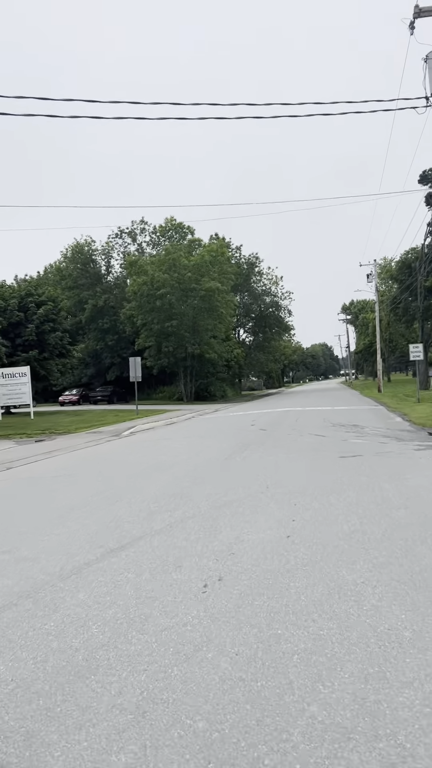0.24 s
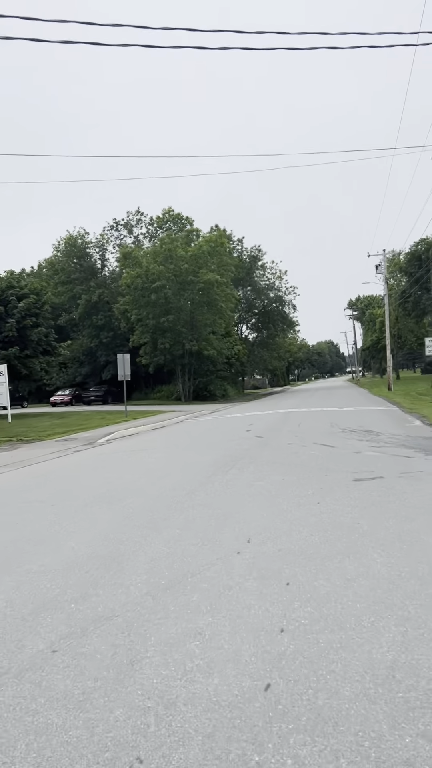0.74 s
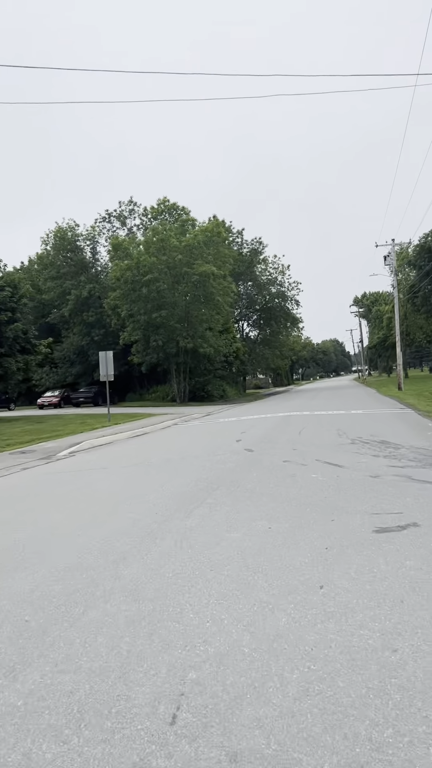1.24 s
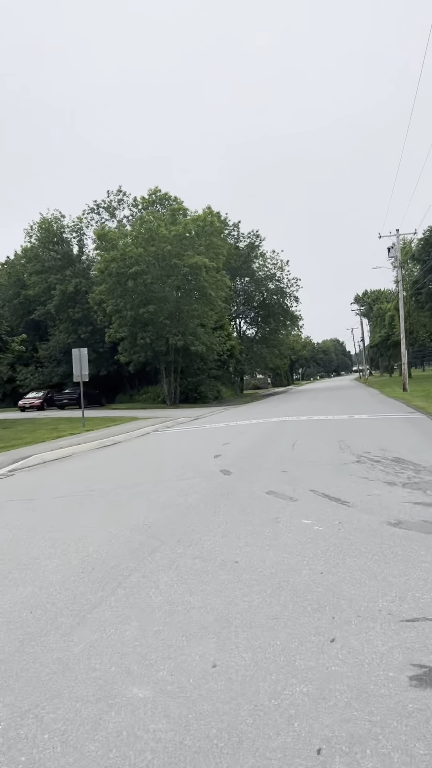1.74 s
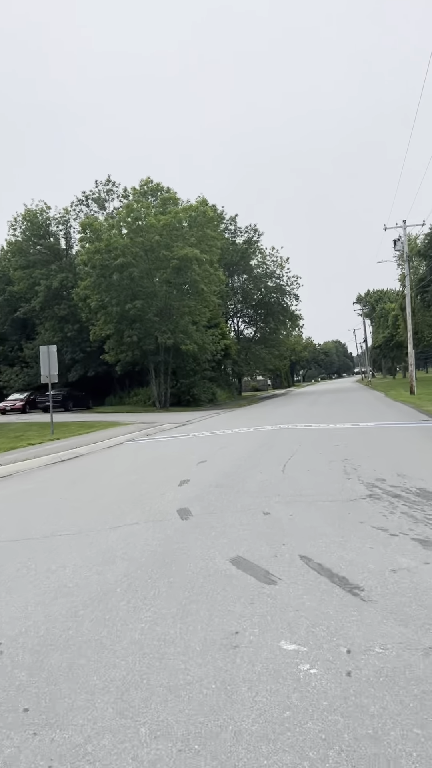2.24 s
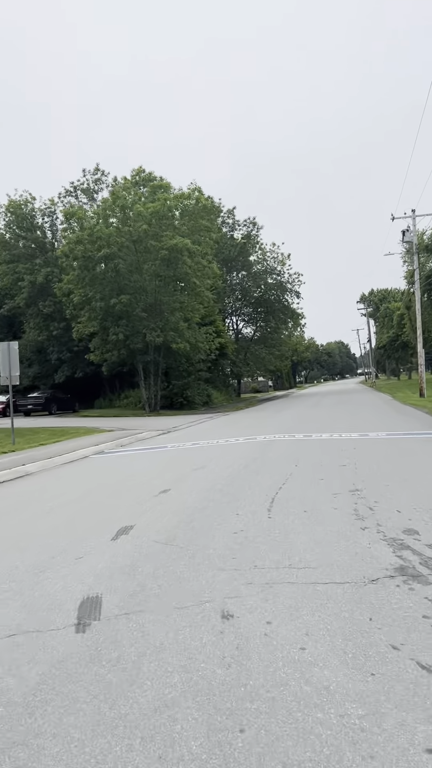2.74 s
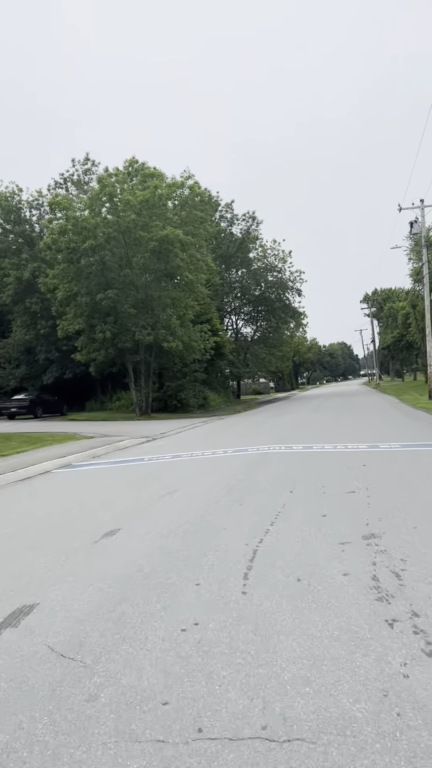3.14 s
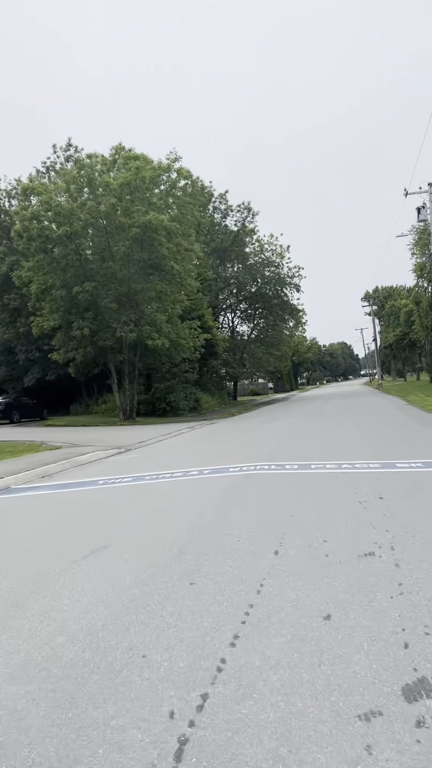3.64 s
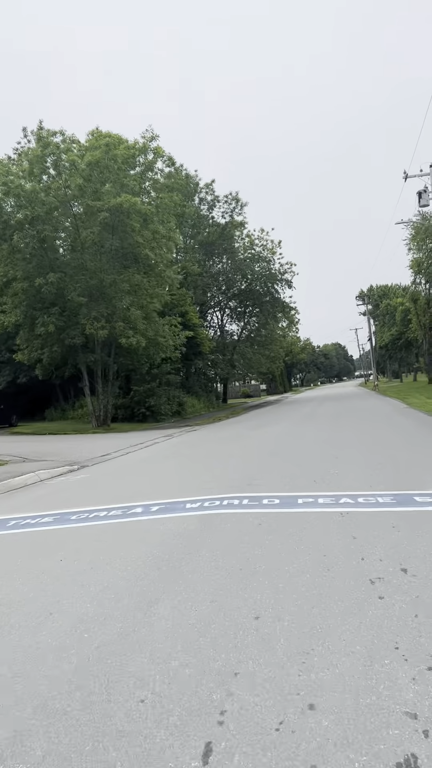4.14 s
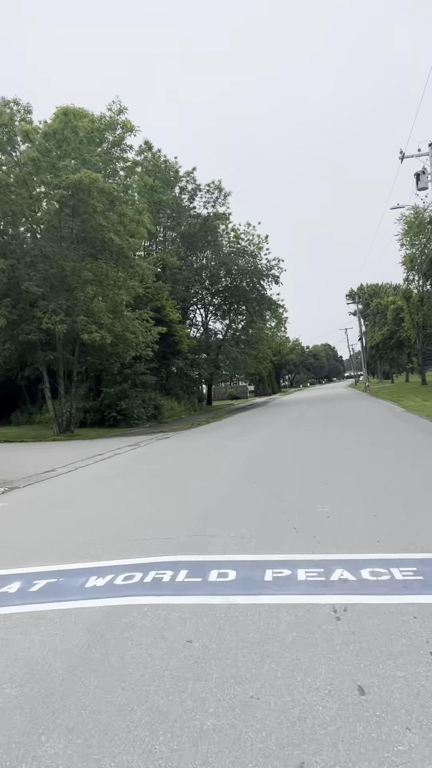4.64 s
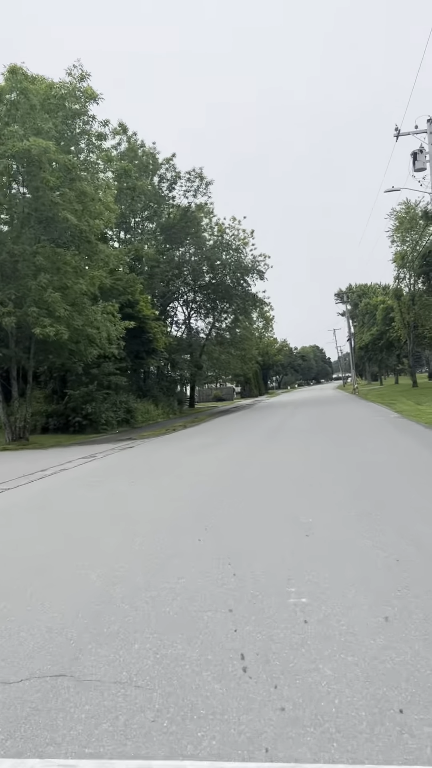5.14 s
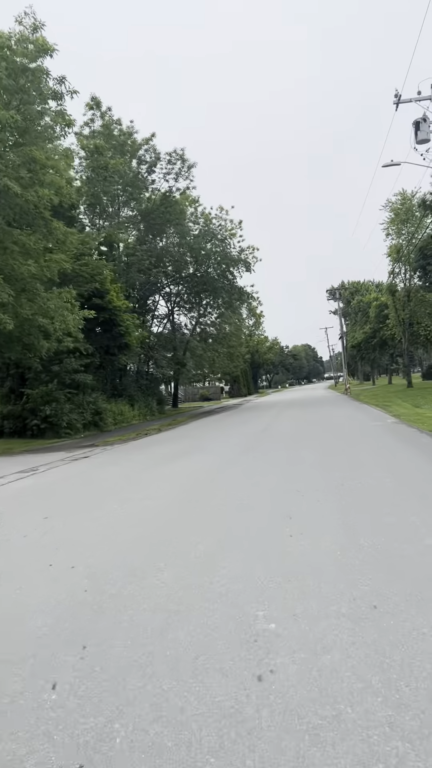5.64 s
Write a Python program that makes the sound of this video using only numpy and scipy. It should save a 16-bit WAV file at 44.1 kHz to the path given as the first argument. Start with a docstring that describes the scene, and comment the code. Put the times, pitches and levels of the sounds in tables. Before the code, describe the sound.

Riding an electric scooter down a street: mid-pitched hum, tyre hiss, constant irregular metallic rattling, and wind buffets that strengthen after two seconds.

```python
"""An electric scooter rolls at a steady speed along an asphalt street, heard by a phone on the handlebar.
From the start the motor hums (two sine waves), the tyres hiss and the wind rumbles (shaped noise).
A loose part of the mount ticks throughout (short ringing tones), with a faint jingle that comes and goes.
Wind thumps (short pressure wiggles) grow strong after about two seconds; the hiss slowly fades
and the octave above the hum slowly grows, with more strong gusts and thumps towards the end."""
import sys
import numpy as np
from scipy import signal
from scipy.fft import rfft, irfft, next_fast_len
from scipy.io import wavfile
from scipy.ndimage import uniform_filter1d

SR = 44100
rng = np.random.default_rng(int(sys.argv[2]) if len(sys.argv) > 2 else 0)


def to_wav(s):
    """Save 16-bit WAV."""
    ch = np.atleast_2d(s).T  # columns
    pcm = np.round(np.clip(ch, -1, 1) * 32767)  # PCM
    wavfile.write(sys.argv[1], SR, pcm.astype(np.int16))


N = 258950  # length [samples]
T = np.arange(N) / SR  # time of every sample [s]
M = next_fast_len(N)  # padded length for quick frequency work [samples]
HZ = np.maximum(np.arange(M // 2 + 1) * SR / M, 1)  # frequency grid [Hz]


def undb(db):
    """Turns decibels into a gain."""
    return 10 ** (np.asarray(db) / 20)


def over_hz(table):
    """Reads the columns of a (frequency, value, ..) table on the frequency grid."""
    hz, *columns = np.transpose(table)
    return np.squeeze([np.interp(np.log(HZ), np.log(hz), column) for column in columns])


def over_time(table):
    """Reads the columns of a (time, value, ..) table, sample by sample."""
    s, *columns = np.transpose(table)
    return [np.interp(T, s, column) for column in columns]


def walk(rate):
    """Wanders smoothly at random: levels held for 1 / rate seconds, averaged twice; spread near 1."""
    hold = int(SR / rate)
    steps = np.repeat(rng.standard_normal(N // hold + 1), hold)
    smooth = uniform_filter1d(uniform_filter1d(steps, hold), hold)
    return 1.236 * smooth[:N]  # makes up for the spread lost in averaging


def scatter(per_s, count):
    """Picks random times [s], each with a number of even random draws from 0 to 1."""
    rows = rng.random((int(per_s * N / SR), count + 1))
    return rows[:, 0] * N / SR, *rows[:, 1:].T


def add(track, s, sound):
    """Mixes a sound into a track from second s."""
    start = max(int(s * SR), 0)
    track[start:start + len(sound)] += sound[:N - start]


def band_pass(order, edges, noise):
    """Keeps only the frequencies between the two edges [Hz]."""
    return signal.sosfilt(signal.butter(order, edges, "band", fs=SR, output="sos"), noise)


def rush(colour, lo_hz, hi_hz, shared_db, shared_rate, own_db, own_rate):
    """Stereo noise whose octave bands throb together and flicker alone; rms 1 from lo to hi before that."""
    # how unlike the two sides are: (frequency [Hz], side level minus mid level [dB])
    width = [(60, -25), (110, -18.5), (200, -12.5), (380, -22), (700, -11), (1000, -6.5), (1450, -6),
             (1800, -33), (2600, -23), (4400, -20), (8120, -9), (15000, -3)]
    lowest, highest = colour[0][0], colour[-1][0]
    gain = undb(over_hz(colour)) * (HZ >= lowest) * (HZ <= highest)
    inside = (HZ > lo_hz) & (HZ < hi_hz)
    gain = gain / np.sqrt(np.sum(gain[inside] ** 2) / len(HZ))
    mid, side = rfft(rng.standard_normal((2, M))) * gain
    side = side * undb(over_hz(width))
    stereo = np.array([mid + side, mid - side])
    out, shared = 0, shared_db * walk(shared_rate)
    for octave in range(int(np.log2(lowest)), int(np.log2(highest)) + 2):
        # neighbouring bands overlap and add up to one
        band = np.cos(np.pi / 2 * np.clip(np.log2(HZ) - octave, -1, 1)) ** 2
        out = out + irfft(band * stereo, M)[:, :N] * undb(shared + own_db * walk(own_rate))
    return out


MEAN_GUST_DB = -35  # the wind level that counts as an average gust


def gust():
    """Tells how far the wind stands above its average level [dB]."""
    # wind on the microphones: (time [s], level [dB])
    gusts = [(0.0, -46), (0.08, -32.5), (0.39, -40.5), (0.49, -33), (0.52, -41), (0.83, -33.5),
             (1.54, -40.5), (1.85, -30.5), (2.17, -33.5), (2.22, -25.5), (2.29, -35), (2.32, -28),
             (2.76, -39.5), (2.89, -32), (2.99, -36.5), (3.01, -32), (4.22, -31.5), (4.33, -34),
             (4.86, -32), (4.87, -26), (4.92, -34.5), (4.98, -25), (5.18, -36), (5.28, -27), (5.35, -35),
             (5.46, -28), (5.75, -41), (5.87, -22)]
    return over_time(gusts)[0] - MEAN_GUST_DB


def wind(gust_db):
    """Moving air presses on the microphones: deep noise that follows the gusts fully."""
    # colour of the deep wind: (frequency [Hz], relative level per Hz [dB])
    colour = [(20, -21), (35, -8), (60, 2.5), (90, 1), (130, -9), (200, -38)]
    noise = rush(colour, 30, 110, shared_db=1.2, shared_rate=20, own_db=0.6, own_rate=15)
    return undb(MEAN_GUST_DB + gust_db) * noise


def flutter(gust_db):
    """Higher wind noise throbs quickly and rises by 0.75 dB for each dB of gust."""
    # colour of the flutter: (frequency [Hz], relative level per Hz [dB])
    colour = [(80, -14), (130, 1.5), (250, 1), (400, -9), (700, -19.5), (1200, -23.5)]
    noise = rush(colour, 116, 350, shared_db=3.05, shared_rate=45, own_db=0.73, own_rate=30)
    return undb(-40.5 + 0.75 * gust_db) * noise


def roar(gust_db):
    """Mid-pitched noise roars fairly evenly, rising by only 0.19 dB for each dB of gust."""
    # colour of the roar: (frequency [Hz], relative level per Hz [dB])
    colour = [(280, -23), (360, -8), (430, 1.5), (540, -0.5), (620, -9), (680, -5.5), (760, -10.5),
              (850, -10.5), (1000, -13.5), (1080, -22), (1500, -30)]
    noise = rush(colour, 388, 1140, shared_db=1.96, shared_rate=40, own_db=1.7, own_rate=60)
    return undb(-43 + 0.19 * gust_db) * noise


def tyres():
    """Tyres hiss on the asphalt: bright noise that slowly fades."""
    # colour of the hiss: (frequency [Hz], relative level per Hz [dB])
    colour = [(900, -8), (1400, -1.5), (1700, 2), (2100, 3), (2800, -1.5), (3500, -10), (4600, -12.5),
              (5500, -22), (9000, -24.5), (10500, -36), (15900, -34)]
    start_db, fade_db_per_s = -48.5, 0.37
    noise = rush(colour, 1200, 3900, shared_db=1.0, shared_rate=40, own_db=1.63, own_rate=90)
    return undb(start_db - fade_db_per_s * T) * noise


def jingle():
    """Dense tiny metallic clicks at the very top, with a duller body, partly unlike on the two sides."""
    # how the jingle comes and goes: (time [s], level [dB])
    jingle_levels = [(0, -65), (.4, -78), (.56, -56.5), (.9, -65), (1.1, -75), (1.3, -61), (1.85, -77),
                     (2.29, -64), (2.6, -69.5), (3.5, -79), (4.27, -65.5), (4.6, -77), (5.23, -66),
                     (5.87, -77)]
    clicks_per_s, decay_s = 120, 0.002
    sizes = undb(np.minimum(5.5 * rng.exponential(size=N), 18))
    clicks = (rng.random(N) < clicks_per_s / SR) * sizes
    tail = np.exp(-np.arange(500) / SR / decay_s)
    envelope = 0.33 + signal.fftconvolve(clicks, tail)[:N]  # clicks above a steady bed
    top = band_pass(3, [14300, 15600], rng.standard_normal((2, N)))
    body = band_pass(3, [6250, 9100], rng.standard_normal((2, N)))
    mid, side = (top + undb(-0.5) * body) * envelope
    stereo = mid + undb(-6.5) * side * np.array([[1], [-1]])
    return undb(over_time(jingle_levels)[0]) * stereo / mid.std()


def knocks():
    """Grit clicks and the deck knocks over cracks: each a short crack of noise around its own pitch."""
    # the clicks: (time [s], peak level [dB], centre frequency [Hz])
    knock_list = [(.307, -26, 2200), (.593, -29, 4500), (.5995, -24.5, 3760), (.621, -40, 6000),
                  (.781, -41, 4870), (0.798, -35, 4500), (1.711, -40, 7000), (2.219, -41, 7900),
                  (2.39, -34.5, 6500), (3.0782, -28.5, 7200), (3.079, -34, 2500), (3.429, -34, 2300),
                  (3.858, -42, 6970), (4.381, -50, 7940), (4.758, -40, 6950), (5.493, -34, 4200)]
    width, t60_s = 0.73, 0.014  # band width as a share of the centre; time to die away by 60 dB
    out, t = np.zeros(N), np.arange(900) / SR
    noises = rng.standard_normal((len(knock_list), len(t)))
    for (s, db, hz), noise in zip(knock_list, noises):
        edges = np.clip(hz * (1 + width * np.array([-.5, .5])), 400, 17000)
        crack = band_pass(2, edges, noise * 1000. ** (-t / t60_s))
        add(out, s, undb(db) * crack / np.abs(crack).max())
    return out


def mount_strike():
    """A few quick contacts ring the same tones of the mount; the low tones build up late."""
    # tones of the mount: (frequency [Hz], relative level [dB], time to die away by 60 dB [s])
    mount = [(435, -14.5, 0.048), (718, -2.5, 0.0081), (1172, -24.5, 0.071), (1860, -11, 0.01),
             (2764, -1, 0.0045), (3594, -15.5, 0.014), (4410, -13, 0.0074), (4800, -6.5, 0.0024),
             (6166, -4, 0.0053), (6800, -6, 0.0056), (7620, -4, 0.012), (7910, -11, 0.0047),
             (8935, -13.5, 0.01), (10080, -12.5, 0.0064), (10560, -4, 0.0021), (11170, -3.5, 0.008),
             (13330, -8, 0.0037), (13240, -6, 0.0033), (14770, -8, 0.0042), (15500, -7, .0035),
             (16070, -14, .003)]
    # contacts within one strike: (time [s], relative level [dB])
    bounces = [(0, -4), (.000225, -1.5), (.00045, -4.5), (.00095, -6.5), (.0018, -19)]
    t, strike = np.arange(2048) / SR, 0
    for k, (hz, db, t60) in enumerate(mount):
        for s, contact_db in bounces:
            late = np.maximum(t - s - .0007 - .55 / hz, 0)  # lower tones wait longer
            fade = (1 - np.exp(-late / .0001)) * 1000. ** (-late / t60)
            ring = fade * np.sin(2 * np.pi * hz * late)
            strike = strike + (-1) ** k * undb(db + contact_db) * ring
    return strike


def ticks():
    """A loose part strikes the mount, with faint random touches in between."""
    # the strikes: (time [s], level [dB])
    tick_list = [(0.0652, -24), (0.1274, -32.0), (0.2346, -30), (0.3442, -23), (0.455, -29),
                 (0.5233, -20.5), (0.6446, -23), (0.7412, -24.0), (0.7948, -30), (0.8559, -24.5),
                 (0.91, -22.5), (0.9498, -27), (1.0199, -21.5), (1.0815, -31), (1.1727, -26.5),
                 (1.248, -22), (1.3055, -24.0), (1.3663, -26.5), (1.4133, -45), (1.4729, -21),
                 (1.5284, -33.5), (1.5829, -25), (1.6483, -35.5), (1.7356, -27.5), (1.8114, -21),
                 (1.902, -47), (1.914, -26), (2.0487, -32), (2.0937, -30.5), (2.1385, -29), (2.1895, -34.5),
                 (2.2716, -27), (2.2975, -41), (2.3688, -32.5), (2.489, -26.5), (2.572, -30), (2.6076, -32),
                 (2.6463, -26), (2.7188, -25), (2.828, -27.5), (2.8941, -28), (2.9858, -38.5),
                 (3.1754, -27.5), (3.212, -44.0), (3.242, -29.5), (3.2941, -24.5), (3.3583, -25),
                 (3.731, -43), (3.815, -37.5), (3.9047, -25.5), (3.9749, -26), (4.037, -36), (4.0933, -30),
                 (4.1398, -30), (4.2086, -19.5), (4.3239, -31), (4.443, -23.5), (4.5579, -31.5),
                 (4.6112, -25), (4.6783, -37.5), (4.7899, -33.5), (4.8396, -35), (4.9063, -23),
                 (4.9736, -39.5), (5.0772, -20.5), (5.1412, -20), (5.1995, -28.5), (5.2548, -23),
                 (5.3154, -24.5), (5.3726, -29), (5.4062, -40), (5.4888, -27), (5.5999, -24.5),
                 (5.7205, -22), (5.8367, -40.5)]
    faint_per_s, faint_db, faint_scatter_db = 4, -49, 7
    pan_spread_db = 1.5  # spread of where a strike lands, left against right
    strike = mount_strike()
    dull = uniform_filter1d(strike, size=5)
    sharp = strike - dull
    at, size = scatter(faint_per_s, count=1)
    faint = np.transpose([at, faint_db + faint_scatter_db * (2 * size - 1)])
    strikes = np.vstack([tick_list, faint])
    # some strikes land flatter and sound thinner, others duller
    draws = rng.standard_normal((len(strikes), 2)) * [0.14, 1]
    out = np.zeros((2, N))
    for (s, db), (edge, place) in zip(strikes, draws):
        sound = (1 - edge) * dull + (1 + edge) * sharp
        pan_db = pan_spread_db * place / 2
        add(out[0], s, undb(db + pan_db) * sound)
        add(out[1], s, undb(db - pan_db) * sound)
    return out


def buffets(gust_db):
    """Eddies and jolts thump: short pressure wiggles of falling pitch, not quite equal on both sides."""
    # the strongest thumps: (middle time [s], peak level before panning [dB], pitch at the middle [Hz])
    strongest = [(.112, -27.5, 157), (.259, -27, 350), (.285, -28, 250), (.446, -23.5, 245),
                 (.476, -21, 109), (.596, -22, 537.4), (.604, -26, 280), (.614, -23, 244), (.774, -28, 70),
                 (.788, -25, 290), (.799, -22.5, 770), (.802, -29, 353), (.903, -25, 314),
                 (.973, -22, 349.8), (1.25, -24.5, 96), (1.705, -23.5, 109), (1.777, -24, 176),
                 (1.797, -23, 121), (1.865, -23, 97), (1.916, -26, 269), (2.075, -21, 137),
                 (2.093, -18.5, 270), (2.113, -18, 217), (2.147, -21, 222), (2.179, -23.5, 216),
                 (2.2, -17, 250), (2.229, -15, 64), (2.23, -18.5, 154), (2.331, -19, 78),
                 (2.361, -20.5, 109.1), (2.435, -21.5, 308), (2.441, -20, 121.5), (2.535, -24, 155),
                 (2.872, -24, 123.8), (2.896, -23.5, 121.4), (3.0815, -25, 746), (3.112, -16.5, 364),
                 (3.119, -22.5, 152.4), (3.151, -19, 196), (3.216, -25, 220), (3.246, -16.5, 195.8),
                 (3.308, -18, 270), (3.321, -20, 310), (3.581, -25.5, 138), (3.621, -19, 139),
                 (3.66, -17, 257), (3.674, -21, 122.4), (3.768, -21.5, 314), (3.84, -20.5, 62.3),
                 (3.93, -20, 80.6), (3.975, -16.5, 250.2), (4.03, -27, 610), (4.035, -17, 248.4),
                 (4.065, -18, 68.8), (4.08, -21, 282.6), (4.119, -19, 244), (4.265, -22, 195),
                 (4.41, -24, 80.25), (4.467, -20.5, 208), (4.719, -19.5, 250), (4.864, -18.5, 248),
                 (4.875, -20.5, 86.2), (4.996, -20, 54.6), (5.046, -20.5, 275.9), (5.226, -20, 298),
                 (5.266, -22.5, 285), (5.282, -19, 119), (5.429, -17.5, 243), (5.438, -21, 200),
                 (5.48, -15.5, 645.6), (5.486, -15, 210.8), (5.523, -22.5, 89), (5.85, -19.5, 152)]
    cycles, sag = 1.27, 0.24  # cycles in half a thump; how far the pitch falls
    eddies_per_s, eddy_db, eddy_scatter_db = 12, -30, 1  # smaller thumps, base level in an average gust
    low_hz, high_hz = 111, 420  # pitch range of the smaller thumps
    at, size, pitch = scatter(eddies_per_s, count=2)
    level_db = eddy_db + gust_db[(at * SR).astype(int)] - eddy_scatter_db * np.log(1 - size)
    eddies = np.transpose([at, np.minimum(level_db, -22), low_hz * (high_hz / low_hz) ** pitch])
    thumps = np.vstack([strongest, eddies])
    out = np.zeros((2, N))
    for (s, db, hz), pan_db in zip(thumps, 0.25 * rng.standard_normal(len(thumps))):
        half_s = cycles / hz
        u = np.arange(-1, 1, 1 / (half_s * SR))  # time in half lengths, 0 in the middle
        thump = np.cos(np.pi * u / 2) ** 2 * np.cos(2 * np.pi * cycles * (u - sag * u ** 2))
        add(out[0], s - half_s, undb(db + pan_db) * thump)
        add(out[1], s - half_s, undb(db - pan_db) * thump)
    return out


def motor():
    """Magnet forces in the hub motor hum at the pole rate; road bumps shake pitch and level."""
    # the hum: (time [s], pitch before shaking [Hz], rms level before shaking [dB])
    hum = [(0.0, 390, -38.5), (0.08, 394.6, -37.5), (0.43, 395, -34.5), (0.65, 393.2, -46.5),
           (0.76, 397.4, -37.5), (1.4, 399.1, -41.5), (1.7, 396.5, -37.5), (2.21, 396.7, -42),
           (2.32, 397.5, -38), (3.25, 390.3, -42), (4.4, 390.4, -37.5), (4.43, 390.2, -42),
           (5.34, 388.6, -37.5), (5.72, 385.4, -44.5)]
    octave_start_db, octave_rise_db_per_s = -56.5, 0.7
    hz, hum_db = over_time(hum)
    phase = 2 * np.pi * np.cumsum(hz * (1 + .003 * walk(25))) / SR
    shake = undb(1.2 * walk(35))
    octave_db = octave_start_db + octave_rise_db_per_s * T + 1.5 * walk(20)
    tones = undb(hum_db) * np.sin(phase) + undb(octave_db) * np.sin(2 * phase)
    return np.sqrt(2) * shake * tones  # the root turns rms levels into sine peaks


def scene():
    """Adds up wind, tyres, rattles and motor around the phone."""
    gust_db = gust()
    air = wind(gust_db) + flutter(gust_db) + roar(gust_db) + buffets(gust_db)
    rattles = jingle() + knocks() + ticks()
    return air + tyres() + rattles + motor()


def record(dry):
    """Two microphone ports hear the treble out of step; the phone drops the deepest bass and cuts the top."""
    # the two ports: (frequency [Hz], phase by which left leads [radians], left minus right level [dB])
    port_table = [(250, -0.068, 0), (407, 0.32, -.5), (740, -0.66, 2.5), (1420, -0.23, 0), (4500, -0.32, 0),
                  (5500, -1, 1.5), (6500, -1.19, 0.5), (16000, -1.76, 0)]
    top_hz = 16700
    lead, pan_db = over_hz(port_table)
    turn = np.exp(.5j * lead) * undb(pan_db / 2)  # half the difference goes to each side
    ports = irfft(rfft(dry, M) * np.array([turn, 1 / turn]), M)[:, :N]
    low_cut = signal.sosfilt(signal.butter(2, 35, "high", fs=SR, output="sos"), ports)
    return signal.sosfilt(signal.ellip(10, .2, 80, top_hz, fs=SR, output="sos"), low_cut)


dry = scene()
out = record(dry)
to_wav(out)
```